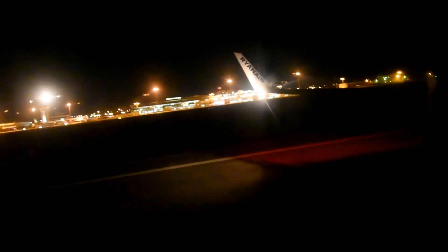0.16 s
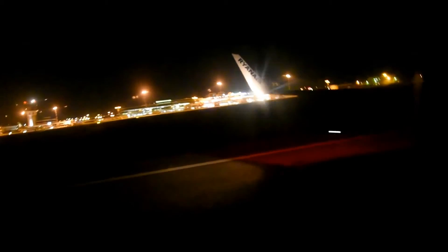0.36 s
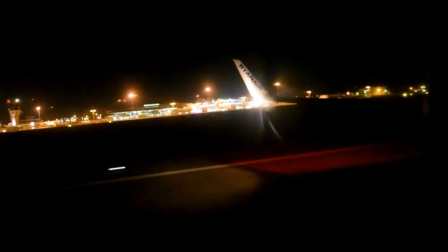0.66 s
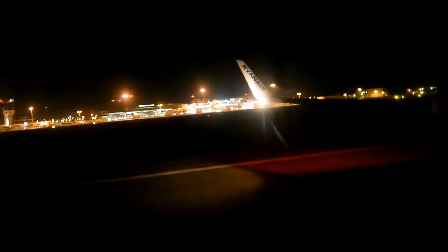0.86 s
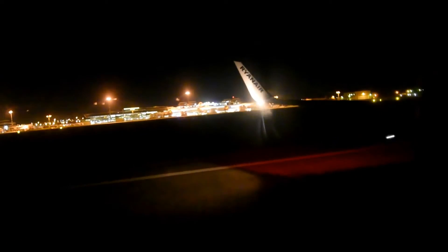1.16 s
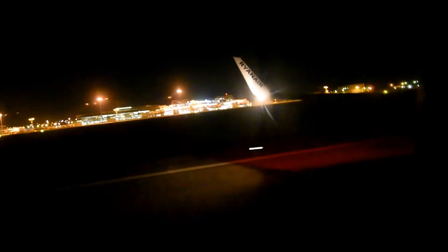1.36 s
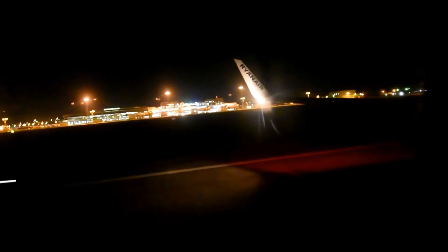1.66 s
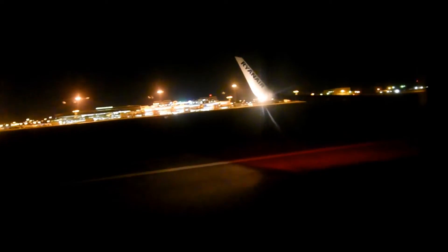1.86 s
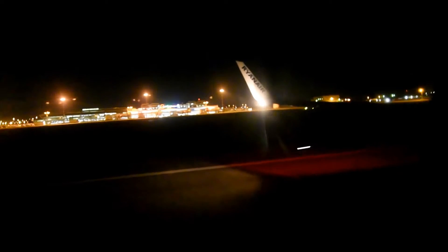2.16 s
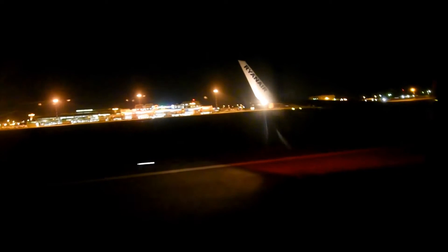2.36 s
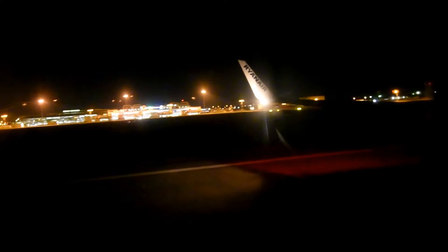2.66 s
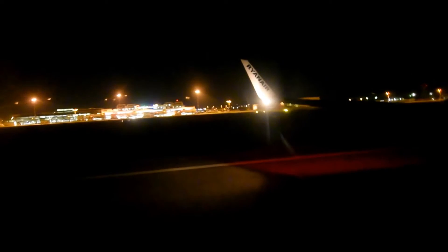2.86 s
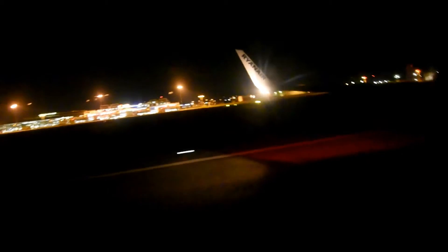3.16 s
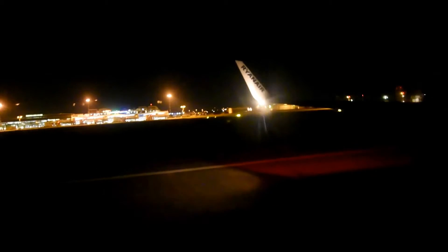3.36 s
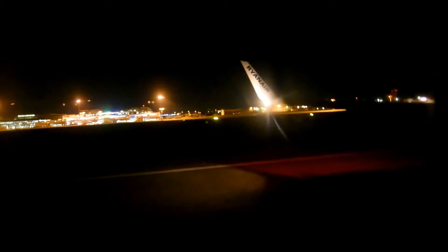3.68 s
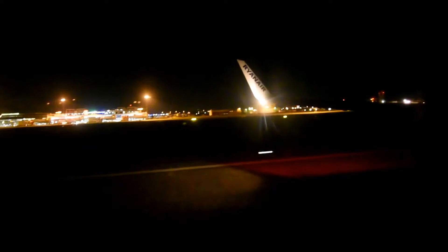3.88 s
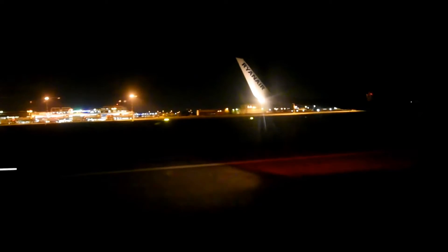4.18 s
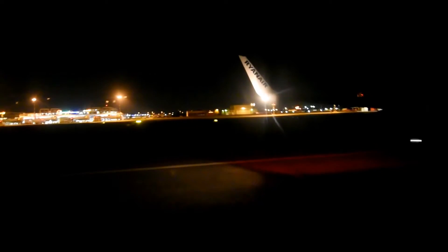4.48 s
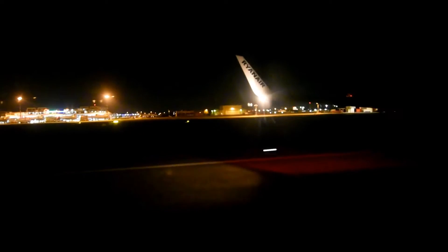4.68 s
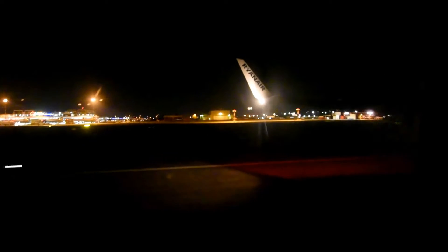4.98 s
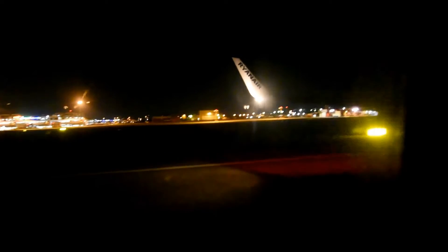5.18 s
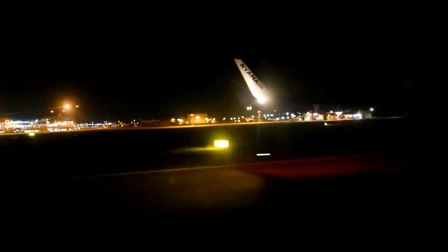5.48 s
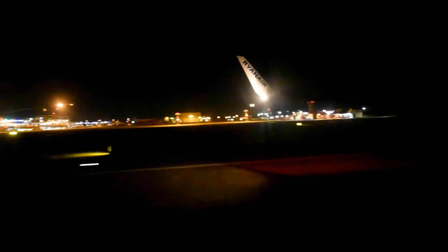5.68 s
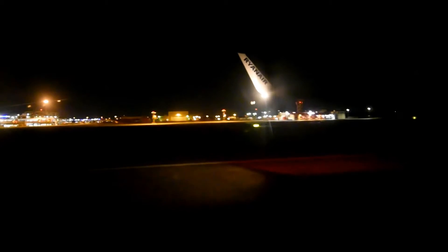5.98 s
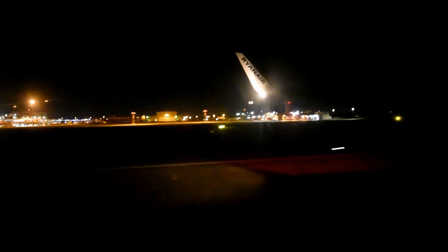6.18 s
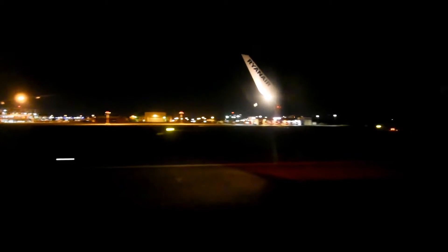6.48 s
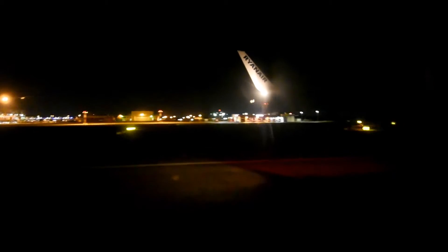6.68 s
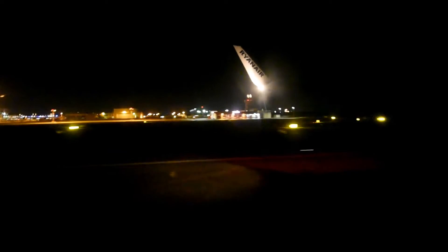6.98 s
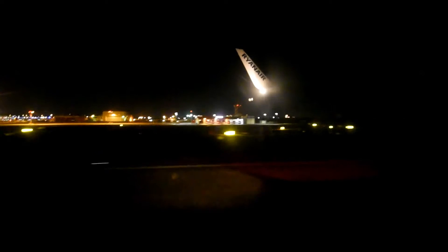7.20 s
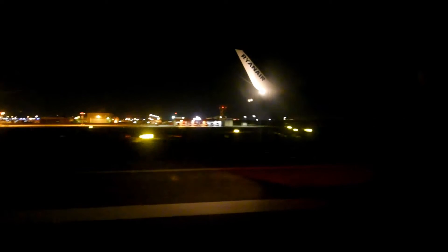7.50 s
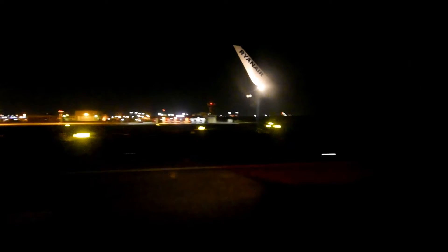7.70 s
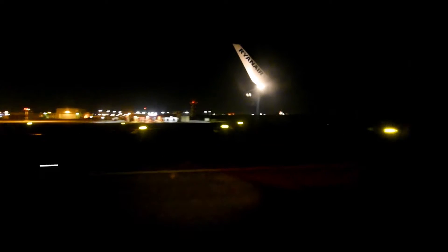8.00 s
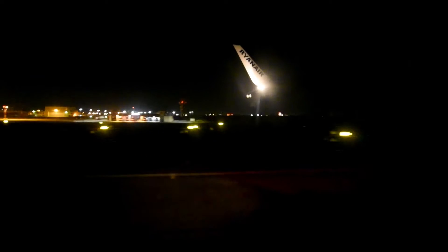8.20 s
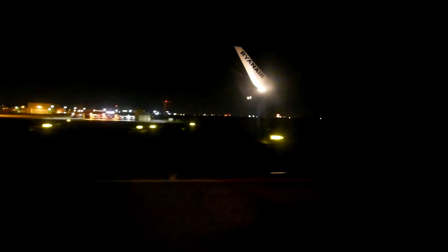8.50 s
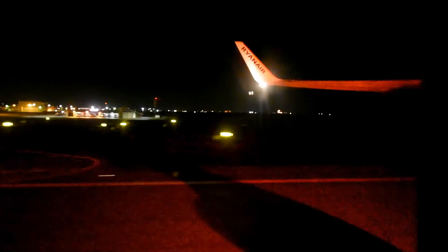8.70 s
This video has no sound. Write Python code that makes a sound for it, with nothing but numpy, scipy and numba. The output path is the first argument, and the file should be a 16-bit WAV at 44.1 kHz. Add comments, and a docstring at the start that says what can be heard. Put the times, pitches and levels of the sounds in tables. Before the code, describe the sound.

A loud, rough jet rumble booms through an airliner cabin during takeoff, while air hisses and loose trim ticks and rattles.

```python
"""An airliner cabin, behind the wing, with the jet engines at takeoff thrust. The exhaust roar booms through
the hull and sets the wall panels buzzing; air hisses along the wall and loose plastic trim rattles. The stereo
microphone hears nearly the same bass at both ports, while the treble spreads wide. The bass overloads the
microphone; a bass cut and a limiter follow."""
import sys
import numpy as np
from scipy import signal
from scipy.fft import rfft, irfft, next_fast_len
from scipy.io import wavfile
from scipy.ndimage import uniform_filter1d, map_coordinates
from numba import njit

SR = 44100
rng = np.random.default_rng(int(sys.argv[2]) if len(sys.argv) > 2 else 0)


def inscribe(sig):
    """Save sig as 16-bit PCM at rate SR to the path in sys.argv[1].

    A 1-D sig is mono; a 2-D sig holds one channel per row.
    Samples are clipped to [-1, 1] before scaling.
    """
    pcm = np.round(np.clip(np.atleast_2d(sig).T, -1, 1) * 32767)
    wavfile.write(sys.argv[1], SR, pcm.astype(np.int16))


N = 390285

BASS_CUT_HZ = 508
SIDE = np.array([[1], [-1]])  # opposite signs at the left and right ports
# Course of the roar, boom as heard through the bass cut: time_s, upper_boom_db, deep_boom_db, buzz_db
ROAR_LEVELS = [(0.0, -12, -15.5, -32.5), (0.6, -12, -13, -29.5), (1.0, -11.5, -14.5, -31),
               (1.5, -11, -17, -31.5), (2.2, -13, -15.5, -29), (2.47, -12, -14.5, -34),
               (2.53, -18, -18.5, -30), (2.61, -12, -17, -29.5), (3.08, -13.5, -14, -31),
               (3.18, -9, -22, -31), (3.28, -13, -11.5, -34), (3.4, -10.5, -14.5, -30),
               (3.55, -11, -21, -32), (3.65, -12.5, -13.5, -34), (3.8, -11.5, -18.5, -32),
               (4.05, -15, -15.5, -27.5), (4.35, -12, -18.5, -31.5), (4.43, -9.5, -12.5, -28),
               (4.5, -12.5, -12.5, -31.5), (4.6, -9.5, -20.5, -28.5), (4.66, -21.5, -23, -31),
               (4.75, -12.5, -14.5, -30.5), (5.2, -13.5, -18, -31.5), (5.4, -10, -16.5, -37),
               (5.55, -11, -19, -32), (5.8, -11.5, -18, -29.5), (6.1, -11.5, -18.5, -29.5),
               (6.7, -10.5, -16, -27.5), (7.0, -12, -19, -30), (7.3, -12, -14.5, -29),
               (7.45, -11, -19.5, -34), (7.75, -13, -16, -31), (8.2, -12.5, -19, -31.5),
               (8.55, -12, -18, -30), (8.85, -13.5, -15, -38)]


def exhaust_roar():
    """Low exhaust noise comes through the hull modes and shakes the wall panels."""
    # Pressure spectrum through the hull: frequency_hz, level_db
    hull_spectrum = [(15, -53), (25, 0.5), (40, -14), (50, 2), (70, -2.5), (115, 0.5), (135, -5.5),
                     (180, -5), (205, -2), (230, -7), (251, -4.5), (270, -9), (310, -12.5), (420, -22),
                     (700, -41), (1200, -53.5), (2500, -86.5)]
    # Spectrum of the roar that differs between the ports: frequency_hz, level_db
    side_spectrum = [(30, -33), (65, -10), (105, -9), (135, 1), (210, 15), (290, 2), (450, -2), (800, -29),
                     (2000, -28.5)]
    split_hz, calm_db, calm_knee = 151.6, 6.0, 3.4
    hull, side = noise(hull_spectrum)[0], noise(side_spectrum)
    deep = lowpass(hull, split_hz, power=8)
    boom = sum(band / rms(bass_cut(band)) * amp(curve(ROAR_LEVELS, column))
               for column, band in [(1, hull - deep), (2, deep)])
    # above calm_db the boom eases off, so the tall swings stand out
    envelope = np.abs(signal.hilbert(boom, next_fast_len(N))[:N])
    height = uniform_filter1d(envelope / amp(calm_db), size=201)
    boom = boom / (1 + height ** calm_knee) ** (0.29 / calm_knee)
    add_pressure_swings(boom)
    return boom + panel_buzz(boom) + amp(-39.5) * side / rms(side) * SIDE


def add_pressure_swings(boom):
    """Tall swings take over the boom for a few milliseconds, each the way the pressure already leans."""
    # Tallest pressure swings of the roar: time_s, height_db
    swings = [(0.055, 12), (0.105, 8), (0.146, 8.5), (0.181, 10.5), (0.282, 10), (0.339, 8), (0.562, 7),
              (0.598, 9.5), (0.62, 8.5), (0.715, 7.5), (0.811, 10.5), (0.842, 6.5), (0.872, 10),
              (0.903, 6.5), (0.92, 9), (0.991, 11.5), (1.197, 8.5), (1.231, 10), (1.288, 10.5),
              (1.331, 9.5), (1.409, 9), (1.541, 9), (1.605, 9), (1.697, 10.5), (1.812, 9), (1.905, 12),
              (2.01, 8.5), (2.059, 11), (2.143, 6.5), (2.22, 8.5), (2.331, 12), (2.363, 8.5), (2.42, 10),
              (2.431, 9), (2.442, 9.5), (2.478, 10.5), (2.571, 10), (2.628, 8), (2.664, 7.5), (2.711, 9),
              (2.773, 7), (2.8, 11.5), (2.845, 10), (2.895, 8.5), (2.953, 8.5), (2.985, 10), (3.009, 8),
              (3.049, 11.5), (3.16, 8.5), (3.299, 8), (3.484, 8.5), (3.515, 12), (3.548, 10.5), (3.698, 10),
              (3.746, 11), (3.771, 10.5), (3.811, 10.5), (3.872, 8), (3.993, 10.5), (4.029, 8), (4.075, 9),
              (4.12, 7), (4.149, 9.5), (4.244, 8.5), (4.29, 8), (4.414, 9.5), (4.476, 9.5), (4.61, 14),
              (4.634, 13), (4.678, 11.5), (4.708, 10), (4.819, 7.5), (4.863, 10.5), (4.897, 10.5),
              (4.988, 9), (5.118, 11), (5.166, 10), (5.331, 9), (5.398, 11), (5.48, 9), (5.592, 13),
              (5.614, 10.5), (5.632, 8.5), (5.739, 8), (5.808, 8), (5.835, 7), (5.846, 8.5), (5.915, 10),
              (5.941, 8.5), (6.017, 10), (6.074, 6), (6.145, 10.5), (6.287, 7.5), (6.313, 12), (6.381, 10),
              (6.425, 8), (6.528, 13.5), (6.574, 11), (6.617, 9), (6.708, 8), (6.763, 10.5), (6.799, 10),
              (6.823, 10), (6.845, 9.5), (6.872, 9.5), (6.918, 13.5), (6.985, 8), (7.022, 8.5), (7.124, 8),
              (7.155, 8.5), (7.233, 8), (7.354, 8.5), (7.378, 9), (7.53, 9), (7.563, 11), (7.594, 8.5),
              (7.699, 7.5), (7.754, 10.5), (7.77, 10), (7.782, 10.5), (7.84, 8.5), (7.856, 8), (7.913, 7),
              (7.979, 8.5), (8.016, 8), (8.037, 9.5), (8.081, 10), (8.103, 9.5), (8.139, 9), (8.161, 7.5),
              (8.249, 8), (8.27, 9), (8.288, 11), (8.303, 8.5), (8.316, 8.5), (8.331, 7.5), (8.377, 7.5),
              (8.583, 8.5), (8.66, 10.5), (8.738, 11)]
    t = np.arange(-SR // 80, SR // 80) / SR
    for time_s, height_db in swings:
        crest = round((time_s + 0.00036) * SR)
        swing_hz = rng.uniform(124, 265)
        blend = np.exp(-((t - .0004) * swing_hz / 0.51) ** 2)
        swing = np.sign(boom[crest]) * amp(height_db) * np.cos(2 * np.pi * swing_hz * t)
        around = boom[crest - len(t) // 2:][:len(t)]
        around += blend * (swing - 0.97 * around)


def panel_buzz(boom):
    """Wall panels buzz harder whenever the boom swells, in a gritty flicker."""
    # Spectrum of the shaken panels: frequency_hz, level_db
    panel_spectrum = [(350, -14), (550, 3.5), (900, -8.5), (1500, -16), (2600, -24.5), (4000, -44.5)]
    growth_power, grit_db, side_db = 1.36, 3.5, -23
    drive = np.abs(uniform_filter1d(np.abs(boom), size=221)) ** growth_power
    grit = amp(grit_db * wobble(rate_hz=150))
    mid, side = drive * grit * noise(panel_spectrum, count=2)
    return amp(curve(ROAR_LEVELS, column=3)) / rms(mid) * (mid + amp(side_db) * side * SIDE)


def air_hiss():
    """Air along the wall hisses with a slight flutter; the treble differs between the ports."""
    # Spectrum of the rushing air: frequency_hz, level_db
    air_spectrum = [(300, -28), (800, 5), (1500, 8.5), (2000, 1), (2700, 2), (4000, -3), (5000, -7),
                    (6200, -8), (7000, -13.5), (10000, -13), (12000, -19.5), (13800, -40), (14700, -39),
                    (15700, -53)]
    # Stereo width of the hiss: frequency_hz, side_over_mid_db
    width = [(60, -45), (110, -43), (200, -33), (380, -38), (700, -12), (1290, -18), (2380, -13.5),
             (4400, -14), (6200, -6.5), (8000, -12), (10000, -4), (11500, -6), (13500, 1), (15000, 9)]
    # Hiss between swells: time_s, level_db
    hiss_levels = [(0, -39.5), (1, -39), (2.1, -40.5), (3.3, -39.5), (4.2, -41), (5.6, -39.5),
                   (6.05, -41.5), (6.4, -39.5), (6.75, -39.5), (7.0, -40), (7.3, -40.5), (8.2, -42),
                   (8.85, -40)]
    mid, side = noise(air_spectrum, count=2)
    side = coloured(side, width)
    level_db = curve(hiss_levels) + hiss_swells() + 0.11 * wobble(rate_hz=11) + 1.36 * wobble(rate_hz=60)
    return amp(level_db) / rms(mid) * (mid + side * SIDE)


def hiss_swells():
    """The hiss's brief changes of level in dB: bell curves that come quicker than they go."""
    # Swells of the hiss: peak_s, rise_db, length_s
    swells = [(0.28, 3.5, 0.032), (0.43, 0.5, 0.091), (0.975, 1, .05), (1.153, 2, 0.072), (1.423, 5, 0.024),
              (1.965, 1, .04), (2.218, 1, 0.036), (2.333, 4, 0.052), (2.434, 5.5, 0.071), (3.23, -1, .07),
              (3.547, 2, 0.082), (3.784, 4.5, 0.059), (3.836, 1, 0.04), (4.107, 3, 0.075), (4.51, 4, 0.19),
              (4.71, 2.5, 0.044), (4.876, 2, 0.04), (5.098, 2.5, .05), (5.185, 2.5, 0.035),
              (6.22, 5.5, 0.08), (6.285, 3, .035), (6.413, 1.5, 0.068), (6.484, 0, .06), (6.615, 2, 0.067),
              (7.318, 4.5, 0.042), (7.545, 6, 0.096), (7.703, 3, 0.17), (7.98, 5, 0.065),
              (8.283, 3.5, 0.032), (8.672, 2.5, 0.043)]
    t, rise_share = np.arange(N) / SR, 0.37
    level_db = np.zeros(N)
    for peak_s, rise_db, length_s in swells:
        width_s = length_s * np.where(t < peak_s, rise_share, 1 - rise_share)
        level_db += rise_db * np.exp(-((t - peak_s) / width_s) ** 2)
    return level_db


def trim_rattle():
    """Loud ticks among a crowd of faint ones; each cracks and rings the loose plastic afresh."""
    # Loudest ticks of the trim: start_s, level_db
    loud_ticks = [(0.071, -41), (0.282, -34), (0.298, -39.5), (0.452, -41), (0.527, -42), (0.824, -40),
                  (0.937, -44), (1.2022, -41), (1.2135, -37), (1.37, -42), (1.413, -35), (1.427, -46),
                  (1.664, -44), (1.681, -42), (1.78, -42), (1.792, -38), (1.875, -36), (1.956, -38),
                  (1.969, -35), (2.045, -39), (2.436, -37), (2.645, -37), (2.707, -46), (3.044, -45),
                  (3.202, -39), (3.264, -37), (3.303, -39), (3.564, -40), (3.795, -36), (3.808, -41),
                  (3.828, -38), (3.844, -38), (4.069, -41), (4.119, -35), (4.368, -41), (4.465, -45),
                  (4.505, -37), (4.524, -37), (4.582, -42), (4.719, -40), (5.28, -45), (5.679, -38),
                  (6.206, -46), (6.228, -41), (6.309, -44), (6.383, -48), (6.572, -44), (6.5964, -42),
                  (7.303, -41), (7.346, -43), (7.544, -35), (7.677, -42), (8.285, -36.5), (8.578, -36.5),
                  (8.668, -43), (8.6986, -41)]
    # Modes of the plastic: pitch_hz, level_db, t60_s, phase_between_ports_turns
    modes = [(2500, 9.5, 0.0063, .05), (4120, 2.5, 0.0077, .08), (5940, -3, 0.014, 0.13),
             (8200, -6, .006, .15), (10060, 1, 0.0089, 0.3), (12600, -5, .006, .3)]
    pitch_scatter, crack_t60_s = 0.023, 0.018
    when, faintness = rng.random((260, 2)).T
    faint_ticks = np.c_[when * N / SR, -50 - 3 * np.log(faintness + .03)]
    rattle, t = np.zeros((2, N + SR)), np.arange(SR // 25) / SR
    for start_s, tick_db in list(faint_ticks) + list(loud_ticks):
        ring = np.zeros((2, len(t)))
        for pitch_hz, mode_db, t60_s, turns in modes:
            decay = amp(mode_db + rng.normal(0, 2.8) - 60 * t / t60_s)
            cycles = pitch_hz * rng.normal(1, pitch_scatter) * t
            ring += decay * np.sin(2 * np.pi * np.array([cycles, cycles + turns]))
        crack = 1.4 * amp(-60 * t / crack_t60_s) * rng.standard_normal((2, len(t)))
        start = round(start_s * SR)
        rattle[:, start:start + len(t)] += amp(tick_db) * (ring + crack)
    return lowpass(rattle[:, :N], corner_hz=14000, power=8)


def amp(db):
    return 10 ** (np.asarray(db) / 20)


def rms(x):
    return np.sqrt(np.mean(x ** 2) + 1e-20)


def curve(rows, column=1):
    """One column of a table timed in seconds, interpolated to every sample."""
    table = np.transpose(rows)
    return np.interp(np.arange(N) / SR, table[0], table[column])


def wobble(rate_hz):
    """A smooth random curve with rate_hz knots a second."""
    knots = rng.standard_normal(int(N * rate_hz / SR) + 4)
    return map_coordinates(knots, [np.arange(N) * rate_hz / SR])


def filtered(x, response):
    """Applies a complex frequency response; mirrored ends keep the edges from clicking."""
    edge = SR // 4
    padded = np.pad(x, [(0, 0)] * (x.ndim - 1) + [(edge, edge)], "reflect")
    size = next_fast_len(N + 2 * edge)
    return irfft(rfft(padded, size) * response(np.fft.rfftfreq(size, 1 / SR)), size)[..., edge:edge + N]


def lowpass(x, corner_hz, power):
    """Zero-phase treble cut, falling by 6 * power dB an octave."""
    return filtered(x, lambda hz: 1 / (1 + (hz / corner_hz) ** power))


def coloured(x, spectrum):
    """Shapes x by points of frequency_hz, level_db, joined on a log frequency axis."""
    points_hz, level_db = np.transpose(spectrum)
    return filtered(x, lambda hz: amp(np.interp(np.log(hz + 1), np.log(points_hz + 1), level_db)))


def noise(spectrum, count=1):
    """Independent noises of one colour."""
    return coloured(rng.standard_normal((count, N)), spectrum)


def flatten_bass_swings(pressure):
    """The tallest bass swings are flattened; part of the treble still ripples across the tops."""
    ceiling, knee = amp(7.0), 15.0
    bass = lowpass(pressure, corner_hz=1300, power=4)
    squeeze = 1 / (1 + np.abs(bass / ceiling) ** knee)
    ripple = (pressure - bass) * (0.58 + 0.59 * squeeze)
    return bass * squeeze ** (1 / knee) + ripple


def bass_cut(x):
    """First-order high-pass: it turns each flat top into a pause with a sharp edge."""
    return filtered(x, lambda hz: 1j * hz / (BASS_CUT_HZ + 1j * hz))


@njit
def peak_hold(peaks, fall):
    """Follows each peak at once and lets go slowly."""
    held = peaks.copy()
    for i in range(1, len(held)):
        held[i] = max(held[i], held[i - 1] * fall)
    return held


def limiter(sound):
    """Ducks at each peak, recovers in tens of milliseconds and rounds off what still tops full scale."""
    threshold_db = -1.5
    overshoot = np.maximum(np.abs(sound).max(0) / amp(threshold_db), 1)
    gain = uniform_filter1d(peak_hold(overshoot, fall=amp(-80 / SR)) ** -.6, size=161)
    ducked = sound * gain
    return ducked / (1 + np.abs(ducked) ** 24) ** (1 / 24)


def scene():
    """The cabin as it reaches the two microphone ports."""
    left_over_right_db = -.08
    return (exhaust_roar() + air_hiss() + trim_rattle()) * amp(SIDE * left_over_right_db / 2)


def record(dry):
    """The microphone chain: flattened bass swings, bass cut, limiter and a steep treble cut."""
    rolloff_hz, top_hz = 15000, 15750
    sound = limiter(bass_cut(flatten_bass_swings(dry)))
    return filtered(sound, lambda hz: (hz < top_hz) / (1 + (hz / rolloff_hz) ** 16))


dry = scene()
out = record(dry)
inscribe(out)
```